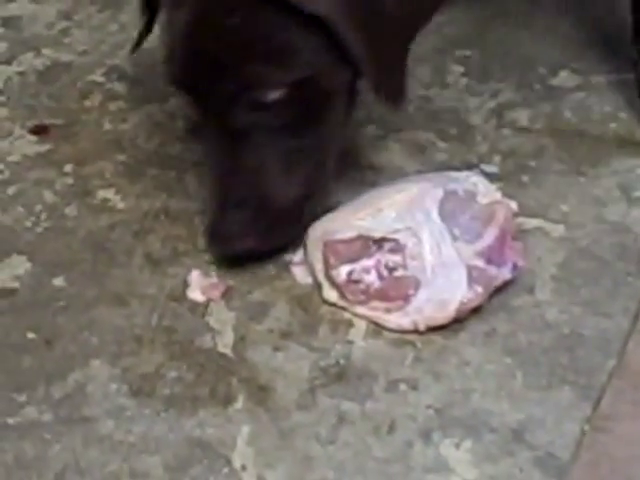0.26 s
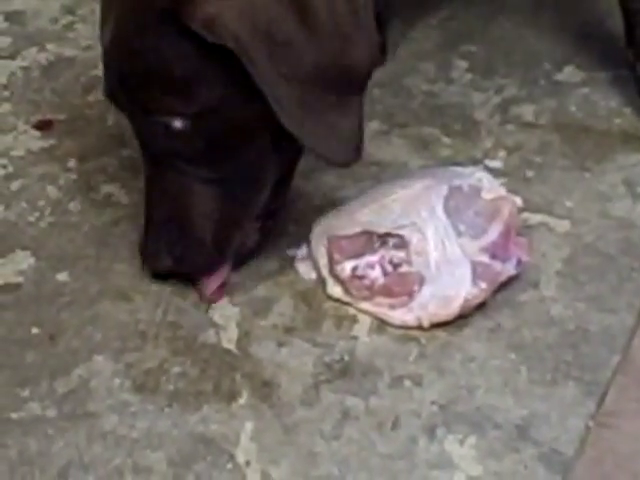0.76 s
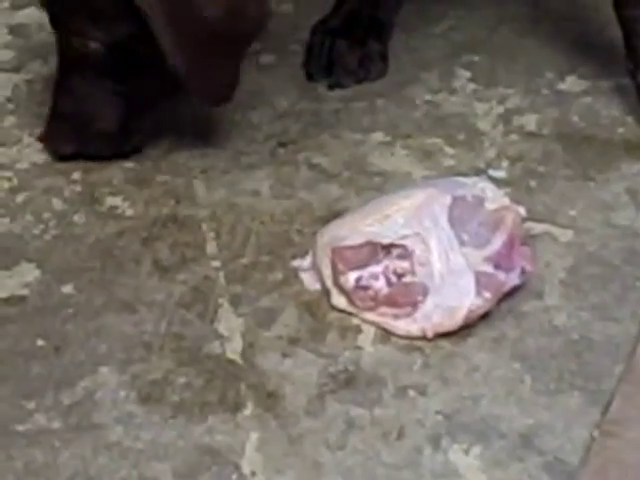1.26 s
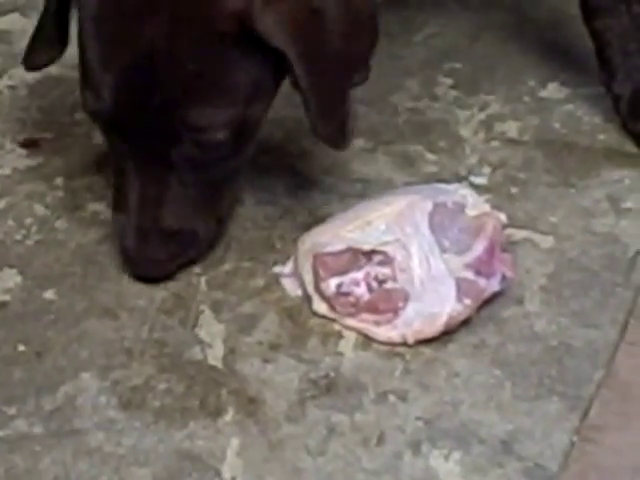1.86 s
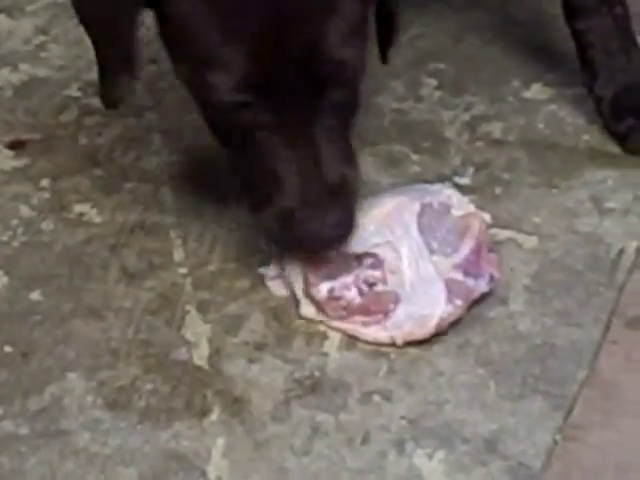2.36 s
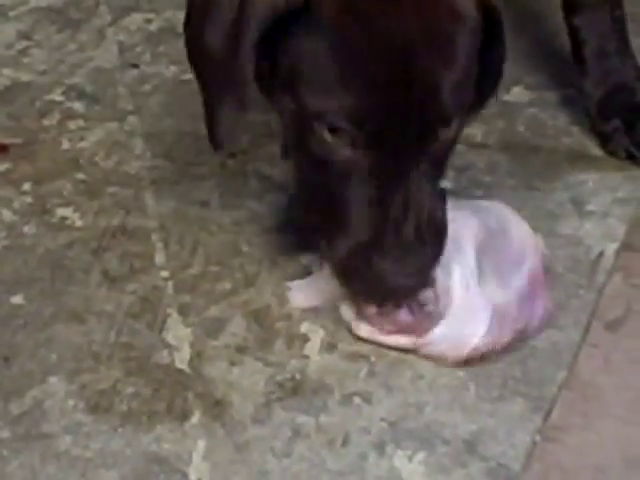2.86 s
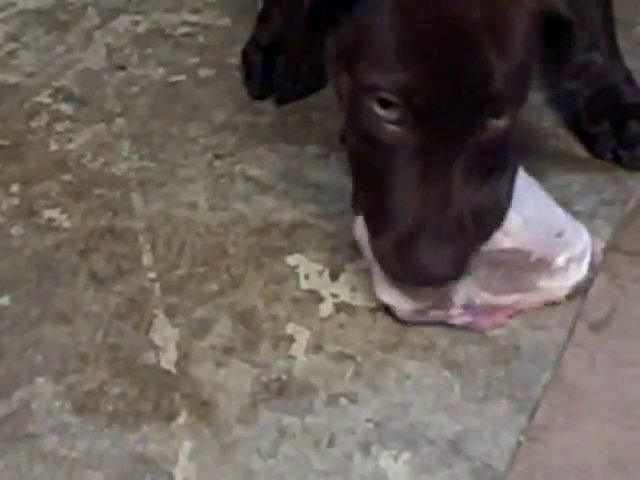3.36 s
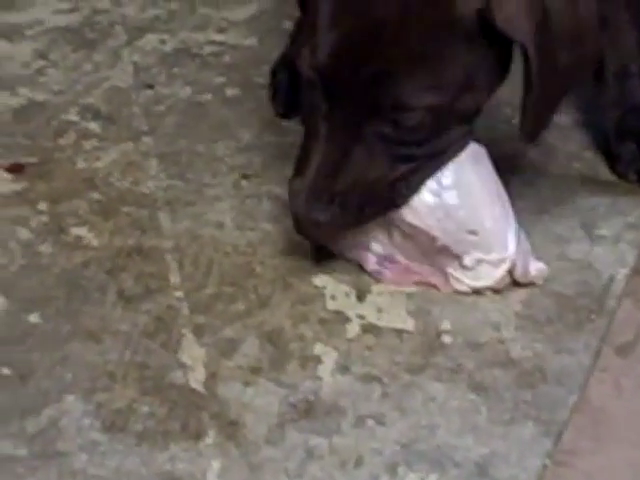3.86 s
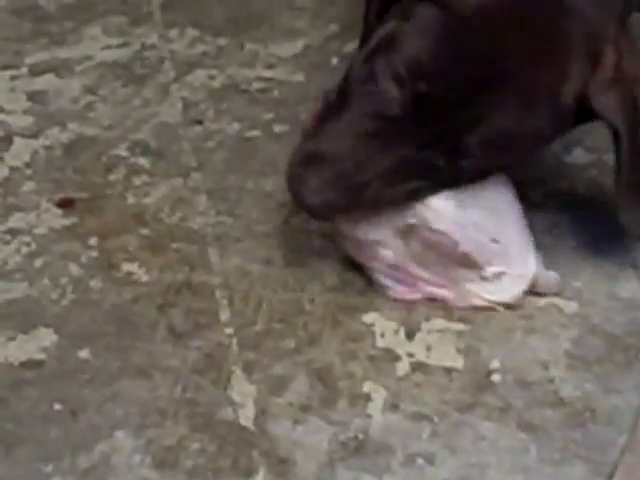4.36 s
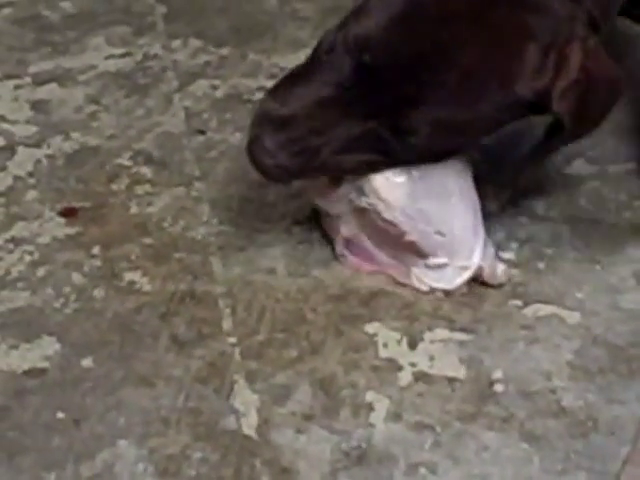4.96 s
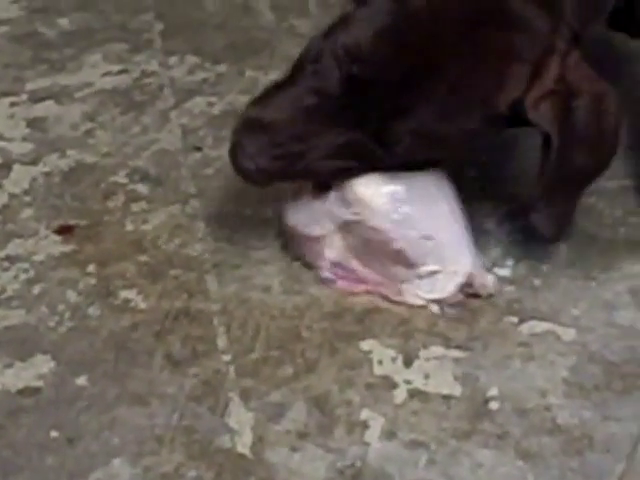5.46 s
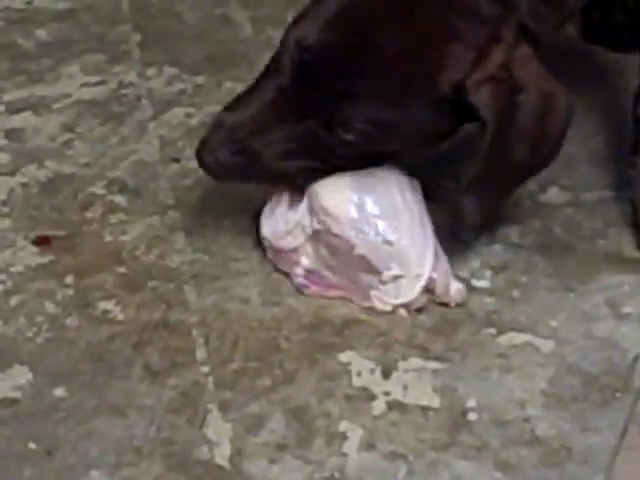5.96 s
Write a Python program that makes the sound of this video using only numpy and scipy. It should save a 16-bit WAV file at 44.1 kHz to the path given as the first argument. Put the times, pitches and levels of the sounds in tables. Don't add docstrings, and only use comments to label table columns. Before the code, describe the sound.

A dog licks, tugs and gnaws raw meat on a concrete floor, with wet crackling, sharp clicks and a loud bone crunch near the end.

```python
import sys
import numpy as np
from scipy import signal
from scipy.fft import rfft, irfft
from scipy.io import wavfile
from scipy.ndimage import uniform_filter1d

SR = 44100
rng = np.random.default_rng(int(sys.argv[2]) if len(sys.argv) > 2 else 0)


def gain_from_db(level_db):
    decades = np.asarray(level_db, float) / 20
    return 10 ** decades


def unload_wav(signal):
    wavfile.write(
        sys.argv[1],
        SR,
        np.round(np.clip(np.atleast_2d(signal).T, -1, 1) * 32767).astype(np.int16),
    )


N = 273420


def level(x, db):
    return x * gain_from_db(db) / np.sqrt(np.mean(x ** 2))


def colour(x, points):
    hz, db = np.transpose(points)
    bins = np.arange(len(x) // 2 + 1) * SR / len(x) + 1
    gain = gain_from_db(np.interp(np.log(bins), np.log(hz), db))
    return irfft(rfft(x) * gain, len(x))


def band(x, lo_hz, hi_hz):
    return signal.sosfilt(signal.butter(2, [lo_hz, hi_hz], "band", fs=SR, output="sos"), x)


def walk(rate):
    k = int(SR / rate)
    held = np.repeat(rng.standard_normal(N // k + 1), k)
    return 1.3 * uniform_filter1d(uniform_filter1d(held, k), k)[:N]


def ring(tear, hz, t60, db):
    p = np.exp(2j * np.pi * hz / SR - np.log(1000) / (t60 * SR))
    z = signal.lfilter([1], [1, -2 * p, p * p], tear)
    return z.real * gain_from_db(db) / np.abs(z).max()


def add(out, s, sound):
    i = int(s * SR)
    out[i:i + len(sound)] += sound[:N - i]


def tears():
    # t/s, peak level/dB, body
    # re snap/dB
    soft_snaps = [(0.0748, -41, -13), (0.399, -34, -12.5), (0.7026, -28.5, -14), (0.705, -35.5, -8),
                  (0.7668, -34.5, -15), (0.788, -34.5, -7), (0.9096, -36.5, -6), (1.142, -36, -2),
                  (1.3555, -33.5, -7), (1.4948, -36, -13), (1.5023, -33, -25), (1.7042, -35, -9.5),
                  (1.7118, -33.5, -27), (2.036, -40, -10), (2.152, -36, -8), (2.1713, -23.5, -15),
                  (2.1797, -22, -6), (2.183, -23.5, -19), (2.192, -39, -12), (2.197, -25, -22),
                  (2.2128, -35, -14), (2.4718, -35, -16), (2.5465, -35.5, -5.5), (2.6559, -45, 2.5),
                  (2.7127, -54, -18), (2.799, -35.5, -9), (2.8306, -31, -11), (2.834, -28.5, -16),
                  (2.8407, -32, -19),
                  (3.0044, -35.5, -8), (3.0228, -29, -10.5), (3.0305, -30, -18), (3.1013, -30.5, -16),
            (3.1133, -26, -18), (3.124, -26.5, -28), (3.1818, -26, -9), (3.2364, -26, -20),
            (3.2397, -28.5, -9), (3.2507, -23, -13), (3.2875, -33, -9), (3.346, -32.5, -16),
            (3.4395, -45, -27), (3.4441, -23.5, -13), (3.4497, -25, -15.5), (3.4778, -26, -26),
            (3.489, -34.5, 2), (3.4935, -30.5, -24), (3.4985, -31, -32), (3.5045, -23.5, -23),
            (3.7816, -52, -12), (3.8031, -24, -17), (3.8395, -27, -18), (3.8448, -33, -4),
            (3.8524, -30.5, -8), (3.863, -20, -17), (3.8737, -42, -19), (3.895, -28, -25),
            (3.926, -31.5, -5.5), (3.952, -33, -17), (3.981, -39, 0),
                  (4.0757, -35.5, -19), (4.1584, -35, -7), (4.1759, -33.5, -5), (4.202, -30.5, -12.5),
             (4.2143, -30, -22), (4.3121, -32.5, -11), (4.351, -35, -3.5), (4.401, -35.5, -20),
             (5.438, -35, -16), (5.48, -35.5, -21), (5.5427, -34, -21), (5.5666, -59, -12),
             (5.586, -34, -13), (5.5968, -33, -7), (5.5998, -29, -3), (5.668, -36, -11), (5.692, -31, -8),
             (5.7208, -34, -19), (5.729, -26, -16), (5.737, -25.5, -10), (5.7815, -34, -13),
             (5.857, -44, -19), (5.872, -29.5, -6), (5.876, -24, -19), (5.9174, -28, -5.5),
             (5.9341, -32, -3), (5.9736, -32.5, -7), (6.0091, -36, -14), (6.104, -29.5, -13),
             (6.113, -38.5, -4), (6.1196, -30, -7)]
    # t/s, peak level/dB, snap f/Hz, body re snap/dB
    cracks = [(4.4772, -39, 6840, 1.5), (4.4844, -32, 7070, -20), (4.5111, -26.5, 7150, -23),
              (4.5445, -33.5, 6860, -2.5), (4.5697, -22, 7360, -12), (4.6565, -24.5, 6400, -13),
              (4.6631, -27.5, 6240, -6), (4.6701, -31, 6370, -10), (4.7053, -22, 5230, -8),
              (4.728, -42, 4540, 8), (4.7548, -15, 4260, -5), (4.7666, -31, 4400, -7),
              (4.8145, -25.5, 6700, -9), (4.869, -38.5, 7250, -5), (4.9053, -31, 7000, -9),
              (4.9312, -44, 7750, -16), (5.0178, -24, 6000, -5.5), (5.0191, -27, 6270, -9.5),
              (5.039, -31.5, 5900, -5), (5.0575, -34, 6970, -13), (5.0738, -29, 5800, -15),
              (5.081, -26.5, 6300, -10.5), (5.1043, -34, 6200, -10), (5.0795, -33, 6600, -10),
              (5.1109, -9, 7100, -10.5), (5.1384, -38, 6900, -16), (5.248, -35, 7700, -7.5)]
    # t/s, peak level/dB, snap f/Hz, body re snap/dB
    splinters = [
        (5.1139, -11, 7060, -9),
        (5.117, -25, 6900, -10),
        (5.1208, -10, 7160, -20),
        (5.1232, -10, 7060, -11),
        (5.129, -27, 7300, -5),
        (5.136, -32.5, 6800, -9),
    ]
    soft = np.array(soft_snaps)
    snap_hz, spread = 6650, 0.087
    hz = snap_hz * (1 + spread * rng.standard_normal(len(soft)).clip(-2, 1))
    first = np.vstack([np.insert(soft, 2, hz, axis=1), cracks, splinters])

    fray_s, fray_db, scatter_db = 0.005, -15, 2.5
    late, size = rng.exponential(size=len(first)), rng.standard_normal(len(first))
    same = np.zeros(len(first))
    fray = first + np.transpose([fray_s * (0.5 + late), fray_db + scatter_db * size, same, same])
    return np.vstack([first, fray])


def snaps(rows):
    out, t = np.zeros(N), np.arange(1024) / SR
    chance = rng.standard_normal((len(rows), 2, 1024))
    for (s, db, hz, body_db), (fine, coarse) in zip(rows, chance):
        body = band(coarse * np.exp(-t / 0.0046), 300, 6800)
        bright = ring(fine * np.exp(-t / 0.0032), hz, 0.0021, db - 2)
        bright[:64] += ring(np.eye(1, 64)[0], hz, 0.00028, db - 0.5)
        body *= gain_from_db(db + body_db + 0.5) / np.abs(body).max()
        add(out, min(s, N / SR), bright + body)
    return out


def clicks():
    # t/s, peak
    # level/dB
    breaks_clean = [(.0155, -36), (.041, -33), (.4008, -30), (2.032, -40), (2.1845, -21), (3.0228, -30),
                    (3.1015, -31), (3.1825, -27), (3.2365, -29), (3.2585, -32), (3.298, -36), (3.348, -31),
                    (3.4505, -26), (3.488, -30), (3.505, -26), (2.6584, -45), (2.7984, -31.5), (3.4397, -30),
                    (3.4472, -24.5), (3.4771, -26.5), (3.4981, -18), (3.8631, -14), (4.1998, -28), (4.3634, -37),
                    (4.5104, -28), (4.568, -24), (4.7069, -23), (4.7562, -11), (4.9315, -34), (5.5423, -24),
                    (5.5687, -34), (5.5855, -26), (5.6015, -24), (5.6925, -22), (5.7866, -32), (5.857, -31),
                    (5.9654, -31), (6.1118, -23.5),
                    (0.0753, -32), (0.1031, -43), (0.2192, -39), (0.5676, -42), (0.749, -36), (0.792, -33),
               (0.8075, -38.0), (0.9112, -41.5), (1.0196, -34), (1.0556, -43), (1.329, -36), (1.3396, -34),
               (1.4974, -29), (1.8776, -41), (1.8949, -39.0), (1.98, -43), (2.106, -39.5), (2.1912, -21),
               (2.252, -37.5), (2.2934, -36), (2.3016, -36), (2.4808, -41), (2.553, -36.0), (2.716, -34.5),
               (2.7217, -43), (2.746, -40), (2.826, -32), (3.1091, -32), (3.2206, -29), (3.2753, -29),
               (3.6243, -37), (3.629, -46), (3.7025, -39.5), (3.71, -46), (3.7835, -39), (4.0825, -38),
               (4.2661, -41), (4.3378, -41), (4.4797, -36), (4.5462, -32.5), (4.6322, -37), (4.7009, -29.5),
               (4.9922, -38), (5.0097, -32), (5.016, -26), (5.2505, -33), (5.4933, -31), (5.5315, -34),
               (5.6674, -39), (5.7046, -34), (5.7327, -32), (5.7893, -32), (5.806, -37), (5.902, -35),
               (5.9724, -28.5), (6.037, -35), (6.1001, -37), (6.1046, -35)]
    out, hit = np.zeros(N), np.eye(1, 128)[0]
    rows = breaks_clean
    for (s, db), spread in zip(rows, rng.standard_normal(len(rows)).clip(-2, 2)):
        bright = ring(hit, 6300 * (1 + 0.06 * spread), 0.0016, db + 1.5)
        dull = ring(hit, 3400, 0.0008, db - 10)
        add(out, s, bright + dull)
    return out


def wetness(rows):
    stir_db, law, full_db = -26, 0.74, -21
    lead_s, fade_s = 0.0054, 0.016
    t = np.arange(N)[:, None][::64] / SR - rows[:, 0]
    shape = np.exp(np.where(t < 0, t / lead_s, -t / fade_s))
    power = shape @ gain_from_db(2 * (stir_db + law * np.minimum(rows[:, 1], full_db)))
    return np.repeat(power, 64)[:N]


def crackle(rows):
    # t/s, crackle level/dB, squelch re crackle/dB
    chew = [(0.0, -44, 3), (0.59, -52, -7.5), (0.95, -46.5, -3.5), (1.17, -47, -2.5), (2.11, -47.5, -7.5),
            (2.76, -46.5, -3.5), (3.04, -43, -6), (3.37, -43.5, -4.5), (3.5, -37.5, 0), (3.76, -49.5, -1.5),
            (3.87, -49.5, 0.5), (4.42, -46.5, -3), (4.77, -42, -1), (4.97, -44.5, -8), (5.2, -38, -3),
            (5.3, -48, 4), (5.84, -50.5, -5), (6.2, -48, -0.5)]
    # f/Hz, level/dB
    mic = [(200, -10.5), (2500, -14.5), (4400, -1), (5000, 0.5), (5700, 4), (6900, 13), (7500, 2),
           (7900, -4)]
    s, crackle_db, squelch_db = np.transpose(chew)
    t = np.arange(N) / SR
    chance, size = rng.random(N), rng.exponential(size=N).clip(0, 3.2)
    breaks = (chance < 3000 / SR) * gain_from_db(4.0 * size) * np.sign(rng.standard_normal(N))
    breaks *= gain_from_db(2.5 * walk(70))
    bright = level(colour(breaks, mic), 0)
    bright *= gain_from_db(22.4 * np.exp(-t / 0.1) - 11.3 * np.exp(-t / 0.34))
    squelch = level(band(np.roll(breaks, N // 3), 215, 6340), -6.0)
    squelch *= gain_from_db(np.interp(t, s, squelch_db))
    effort = gain_from_db(2 * np.interp(t, s, crackle_db) - 18.0)
    return (bright + squelch) * np.sqrt(effort + wetness(rows))


def pops():
    # t/s, peak
    # level/dB, f/Hz
    pockets = [(1.251, -40, 3190), (2.151, -43.5, 3230), (2.18, -32.5, 5000), (2.803, -46.5, 2620),
               (3.185, -31.5, 5300), (3.234, -52, 5200), (3.49, -35.5, 2330), (3.805, -39, 4550),
               (3.833, -36.5, 4250), (3.864, -41, 3130), (3.923, -45.5, 2630), (4.216, -38.5, 4720),
               (4.402, -43, 2150), (4.482, -36, 3300), (4.546, -38, 4700), (4.706, -45, 3200),
               (4.726, -37, 4530), (4.754, -34, 2980), (4.814, -39, 2280), (5.016, -28.5, 4450),
               (5.017, -42, 3100), (5.112, -20.5, 4580), (5.116, -15, 5680), (1.143, -49, 2280),
               (4.148, -44, 3140), (1.419, -49, 3100), (1.462, -49, 2040), (5.112, -34, 2730),
               (5.122, -36, 4180), (5.583, -43, 2680), (5.6, -33, 2250), (5.7, -42, 2180),
               (5.877, -35, 4330), (6.034, -43, 2300), (6.119, -35.5, 2420),
               (1.254, -43, 610), (1.895, -40, 590), (2.182, -42.5, 1370), (3.031, -44, 507),
              (3.191, -49, 870), (3.391, -42.5, 444), (3.452, -43, 700), (3.49, -39, 870),
              (3.809, -44, 646), (3.833, -41, 1570), (4.04, -48, 790), (4.04, -50, 2260),
              (4.045, -46, 1530), (3.033, -45.5, 1690), (6.06, -46, 2100), (4.318, -46, 2420),
              (.885, -52.5, 685), (4.6, -64, 500), (4.765, -34, 785), (4.15, -45, 940), (4.194, -46, 1000),
              (4.322, -46.5, 474), (4.756, -43, 600), (4.76, -34, 1420), (5.245, -40.5, 1390),
              (5.439, -48.5, 1790), (6.025, -46, 1780), (4.178, -45, 520), (4.18, -46, 900),
              (4.358, -48, 2100), (5.541, -46, 800), (5.583, -46, 1780), (5.44, -50, 2600),
              (1.143, -51, 980), (.783, -52, 1000), (.332, -52, 2150)]
    out, t = np.zeros(N), np.arange(2048) / SR
    rows = pockets
    chance = rng.standard_normal((len(rows), 2, 2048))
    for (s, db, hz), (noise, spray) in zip(rows, chance):
        longer = (2000 / hz) ** 0.5
        fade = np.exp(-t / (0.0071 * longer))
        tone = ring(noise * fade, hz, 0.0065 * longer, db - 1.0)
        splash = ring(spray * fade, 1.14 * hz, 2.3 / hz, db - 15)
        add(out, s, tone + splash)
    return out


def drags():
    # t/s, fade/s, centre f/Hz, level/dB
    slides = [(0.0, .04, 5300, -52), (0.0, .03, 3400, -63), (2.27, .04, 5200, -52),
              (1.81, 0.042, 3300, -57.5), (3.001, .02, 6200, -51), (3.022, 0.064, 5640, -45.5),
              (3.102, .03, 6200, -52), (3.15, 0.012, 5800, -46), (3.18, 0.026, 5640, -38.5),
              (3.235, 0.015, 5600, -46), (3.263, 0.038, 5500, -42), (3.346, 0.025, 6300, -46),
              (3.372, 0.0095, 3900, -46), (3.388, 0.0087, 2100, -45), (3.501, 0.069, 6400, -42),
              (3.805, 0.011, 4000, -41), (3.832, 0.013, 4300, -39), (3.953, 0.013, 3800, -46),
              (4.2, 0.044, 5650, -45.5), (4.682, 0.019, 5200, -49), (4.72, 0.024, 4800, -41),
              (4.759, 0.071, 3540, -46), (4.82, 0.034, 6000, -52.5), (5.87, 0.025, 4500, -46),
              (5.916, 0.035, 4600, -43.5), (6.025, 0.016, 4800, -43.5), (6.099, .03, 5100, -53.5),
              (5.13, 0.048, 7060, -43), (0.55, 0.12, 5700, -57), (4.147, .04, 2210, -62),
              (4.309, 0.05, 2580, -59)]
    out, t = np.zeros(N), np.arange(8192) / SR
    for s, fade_s, hz, db in slides:
        slips = (rng.random(len(t)) < 0.05) * rng.laplace(size=len(t))
        slips *= gain_from_db(3.5 * walk(150)[:len(t)])
        swell = (1 - np.exp(-t / 0.0027)) * np.exp(-(t / fade_s) ** 1.6)
        add(out, s, level(band(slips, hz / 1.32, hz * 1.34), db) * swell)
    return out


def nose():
    # t/s,
    # length/s, first f/Hz, last f/Hz, peak level/dB
    whistles = [(.305, 0.08, 790, 850, -61), (0.933, 0.079, 638, 742, -47.5), (.98, 0.076, 800, 815, -48.5),
                (1.005, 0.053, 692, 721, -54), (1.05, 0.075, 827, 845, -54.5),
                (.915, 0.07, 913, 930, -52.5), (0.987, .075, 1720, 1620, -60),
                (1.055, 0.04, 1605, 1630, -62), (2.325, 0.086, 770, 745, -53), (4.08, .065, 770, 850, -54),
                (5.255, 0.14, 880, 860, -49), (5.25, 0.11, 1780, 1830, -52.5),
                (3.484, 0.058, 890, 873, -46.5), (3.185, 0.041, 907, 895, -55),
                (3.388, 0.033, 476, 513, -61), (4.022, 0.045, 2310, 2270, -60),
                (.925, .08, 1310, 1350, -67), (.96, .05, 1420, 1640, -65), (1.2, .1, 900, 960, -64),
                (1.195, .03, 510, 560, -63), (4.35, .05, 310, 300, -60), (4.02, .05, 490, 500, -62),
                (4.04, .03, 790, 770, -54), (5.585, .04, 880, 890, -59), (5.2, .07, 830, 870, -60),
                (5.245, .05, 2130, 2200, -61), (4.32, 0.018, 495, 474, -59.5)]
    out = np.zeros(N)
    flutter = walk(170) + 1j * walk(170)
    for s, length, first_hz, last_hz, db in whistles:
        done = np.linspace(0, 1, int(length * SR))
        on = slice(int(s * SR), int(s * SR) + len(done))
        turn = np.exp(2j * np.pi * np.cumsum(first_hz + (last_hz - first_hz) * done) / SR)
        breath = band(rng.standard_normal(4 * 4096), first_hz / 1.25, last_hz * 1.25)
        breath = level(breath, -8)[:len(done)]
        steady = min(1.4 * (800 / first_hz) ** 1.3, 1.9)
        tone = (steady + 0.7 * flutter[on]) * turn
        octave = 0.15 * flutter[::-1][on] * turn ** 2
        swell_db = np.interp(done, [0, 0.3, 1], [-6, 0, -9])
        gain = signal.windows.tukey(len(done), 0.35) * gain_from_db(db + swell_db)
        out[on] += ((tone + octave).real + breath) * gain
    return out


def sniffs():
    # t/s, length/s, low rustle level/dB, nostril hiss level/dB
    breaths = [
        (0.0, .06, -60, -62),
        (3.44, .12, -56, -62),
        (0.047, 0.35, -61, -72),
        (0.908, 0.11, -64, -53),
        (4.76, 0.14, -57, -63),
        (5.224, 0.15, -55, -58.5),
    ]
    out = np.zeros(N)
    rustle = level(band(rng.standard_normal(N), 220, 1000), 0) * gain_from_db(2.8 * walk(40))
    hiss = level(band(rng.standard_normal(N), 4400, 6500), 0) * gain_from_db(1.9 * walk(60))
    for s, length, rustle_db, hiss_db in breaths:
        on = slice(int(s * SR), int((s + length) * SR))
        air = rustle[on] * gain_from_db(rustle_db) + hiss[on] * gain_from_db(hiss_db)
        add(out, s, air * np.hanning(on.stop - on.start))
    return out


def thumps():
    # t/s, peak level/dB, floor f/Hz, slap re thump/dB
    landings = [
        (1.898, -45.5, 127.3, -15),
        (1.935, -46, 115, -1.5),
        (2.1, -48.5, 135, -5),
        (4.754, -48, 204, 19.5),
        (5.111, -47, 79.5, -12),
    ]
    out, t = np.zeros(N), np.arange(4096) / SR
    chance = rng.standard_normal((len(landings), 4096))
    for (s, db, hz, slap_db), noise in zip(landings, chance):
        push = np.exp(-t / 0.00085)
        slap = ring(noise * push, 483, 0.0078, db + slap_db)
        add(out, s, ring(push, hz, 0.048, db) + slap)
    return out


def ticks():
    # t/s, peak level/dB
    touches = [(0.2134, -38), (0.222, -38), (0.299, -45), (0.323, -39.5), (0.37, -43), (0.454, -46),
               (0.5687, -44.5), (0.7463, -41.5), (1.324, -38), (1.334, -37), (1.612, -52), (1.636, -51),
               (2.031, -40), (2.107, -45), (2.285, -42), (2.298, -36.5), (2.4628, -46), (2.5103, -41.5),
               (2.747, -47), (3.3584, -37)]
    out, t = np.zeros(N), np.arange(512) / SR
    for (s, db), noise in zip(touches, rng.standard_normal((len(touches), 512))):
        grit = band(noise * np.exp(-t / 0.0054), 2500, 8100)
        add(out, s, grit * gain_from_db(db) / np.abs(grit).max())
    return out


def room(x):
    # f/Hz, level/dB
    reply_colour = [(300, -4), (4500, -2), (6000, -10), (7000, -0.5), (7800, -12.5)]
    t60_s, reply_db = 0.25, -8
    t = np.arange(SR // 2) / SR
    tail = rng.standard_normal(len(t)) * np.exp(-np.log(1000) * t / t60_s)
    tail *= 1 - np.exp(-t / 0.00043)
    reply = colour(tail, reply_colour) * gain_from_db(reply_db) / np.sqrt(np.sum(tail ** 2))
    reply[0] = 1
    return signal.fftconvolve(x, reply)[:N]


def hush():
    # f/Hz, level per Hz/dB
    spectrum = [(12, -32), (20, 10.5), (46, 7.5), (423, -7.5), (874, -7.5), (1180, -15.5), (1630, -15.5),
                (2500, -13), (4020, -20), (5160, -30.5), (6630, -4.5), (7150, -6.5), (7900, -8.5),
                (10300, -8), (17400, -120)]
    air = level(colour(rng.standard_normal(N), spectrum), -54.5)
    low = band(air, 16, 430)
    return low * gain_from_db(0.5 * walk(1.7)) + (air - low) * gain_from_db(0.11 * walk(9.2))


def whine():
    whine_hz, flip_hz, whine_db = 7627.1, 29.1, -55
    t = np.arange(N) / SR
    tone = np.sqrt(2) * gain_from_db(whine_db) * np.sin(2 * np.pi * whine_hz * t)
    return tone * signal.square(2 * np.pi * flip_hz * t)


def scene():
    # f/Hz, level/dB
    edge = [(7300, 0), (7700, -.5), (8000, -5)]
    rows = tears()
    dog = snaps(rows) + pops() + crackle(rows) + nose() * gain_from_db(-2.5) + thumps() + ticks()
    dog += clicks() + drags() + sniffs()
    return (room(colour(dog, edge)) + hush() + whine())[None]


def low_pass(x):
    return signal.sosfilt(signal.butter(12, 10460, fs=SR, output="sos"), x)


def record(dry):
    # f/Hz, level/dB
    mirror = [(8030, 1.5), (8300, -4.5), (8700, -10.5), (9200, -18), (9700, -30), (10300, -50.5)]
    converter_hz = 16000
    rounded = 0.45 * np.tanh(dry[0] / 0.45)
    kept = colour(rounded, [(7750, 0), (7900, -5), (7990, -20), (8010, -90)])
    image = 2 * kept * np.cos(2 * np.pi * converter_hz * np.arange(N) / SR)
    image = colour(image, [(8000, -90), *mirror, (11000, -100)])
    fade_out = np.minimum(np.arange(N, 0, -1) / 64, 1)
    return low_pass(((kept + image) * fade_out)[None])


dry = scene()
out = record(dry)
unload_wav(out)
```